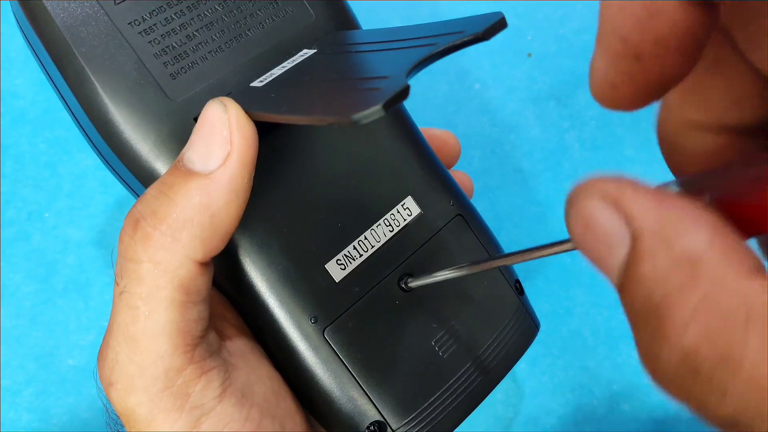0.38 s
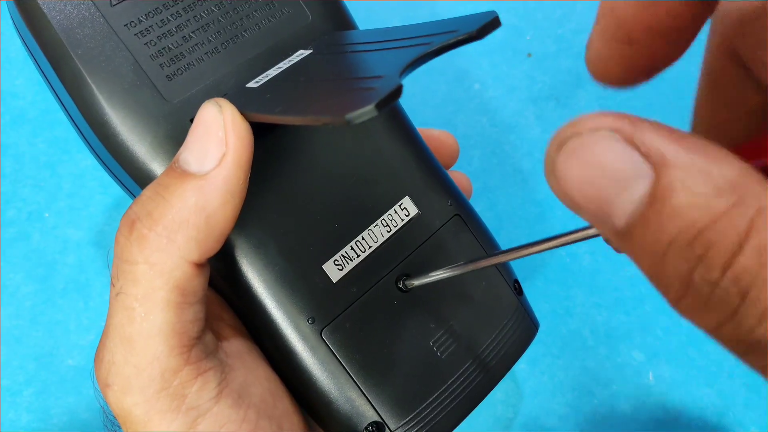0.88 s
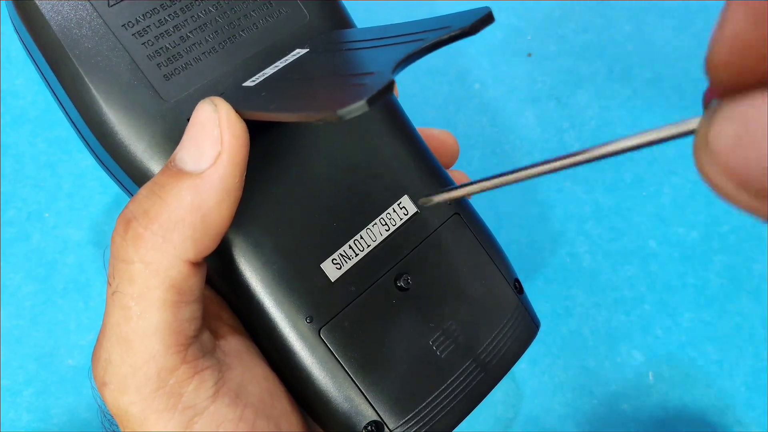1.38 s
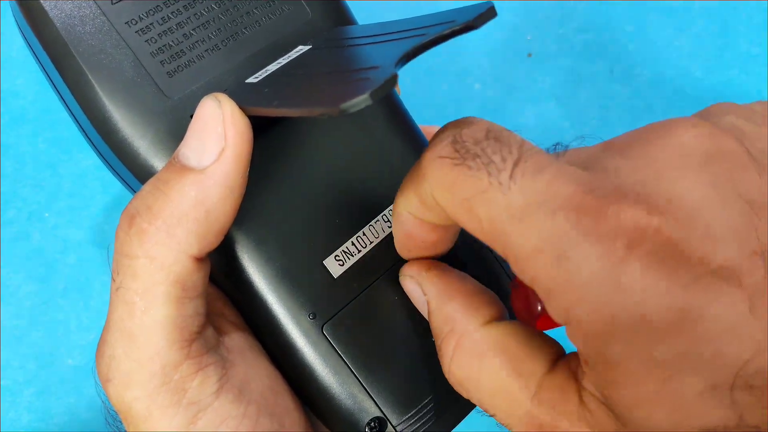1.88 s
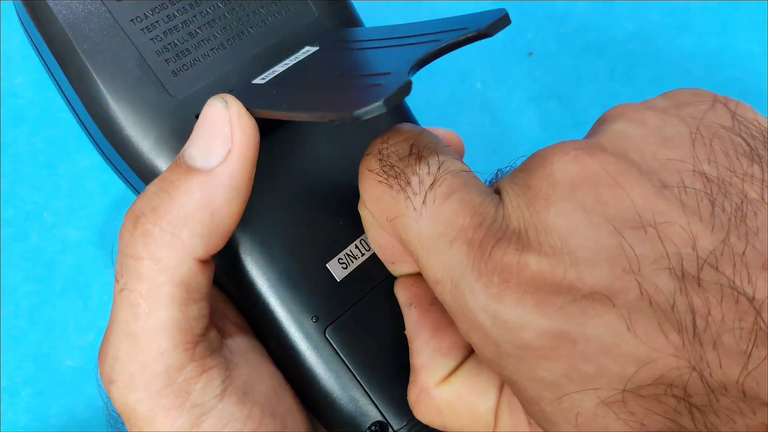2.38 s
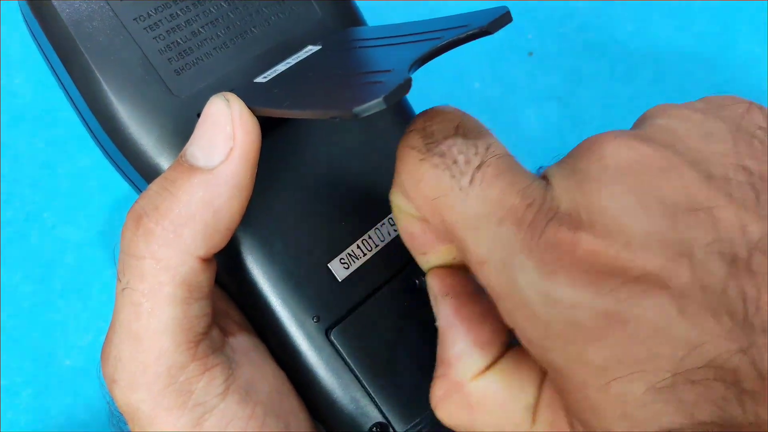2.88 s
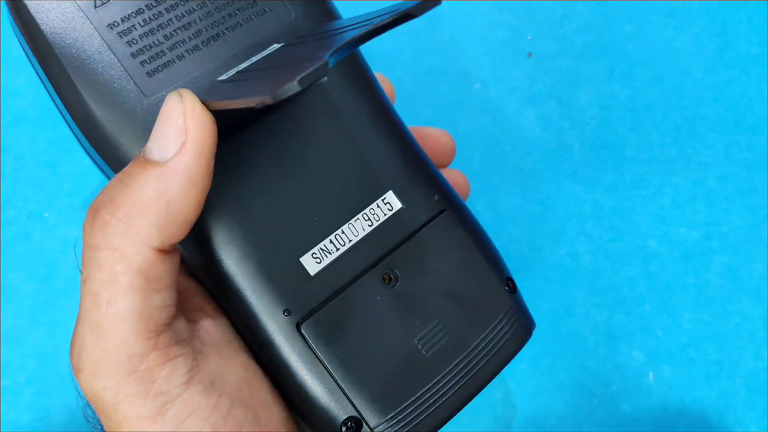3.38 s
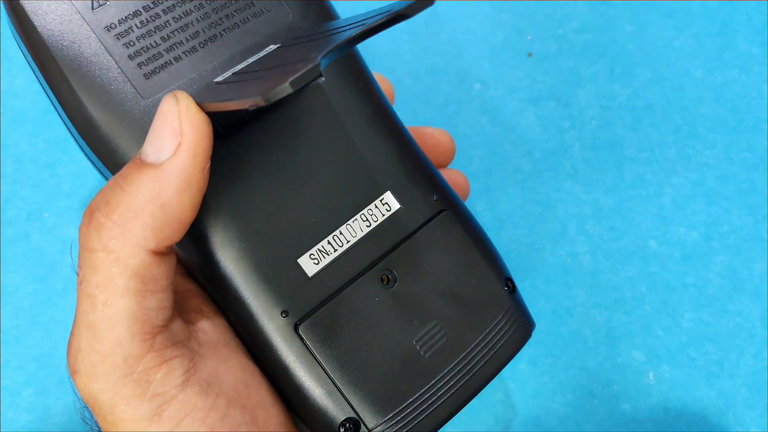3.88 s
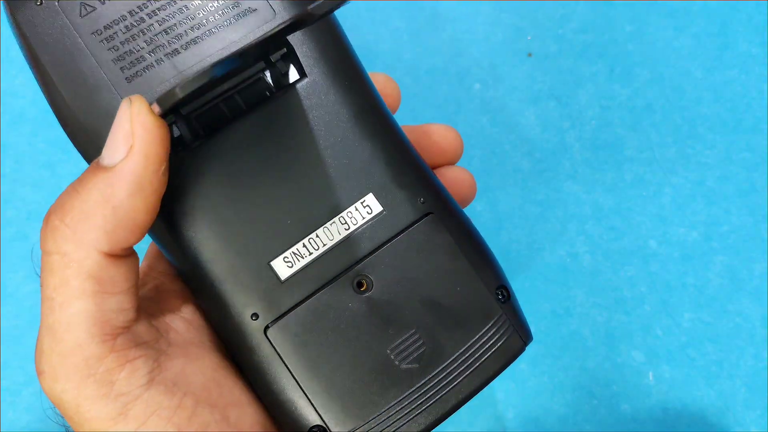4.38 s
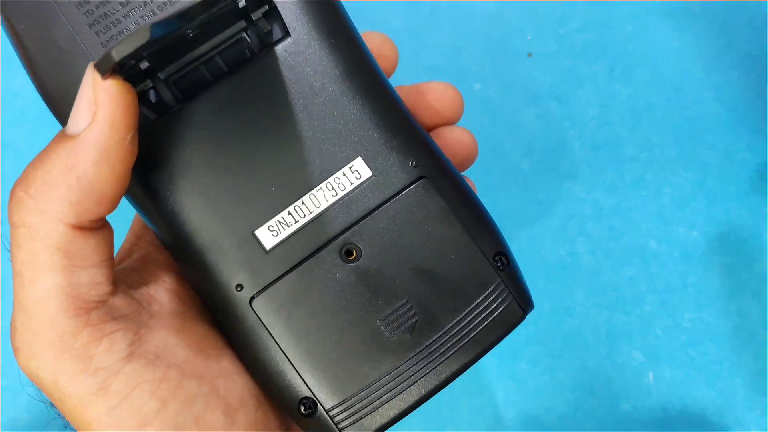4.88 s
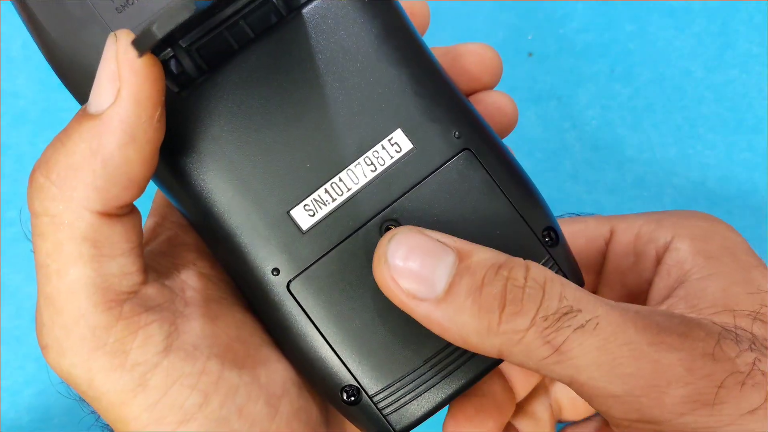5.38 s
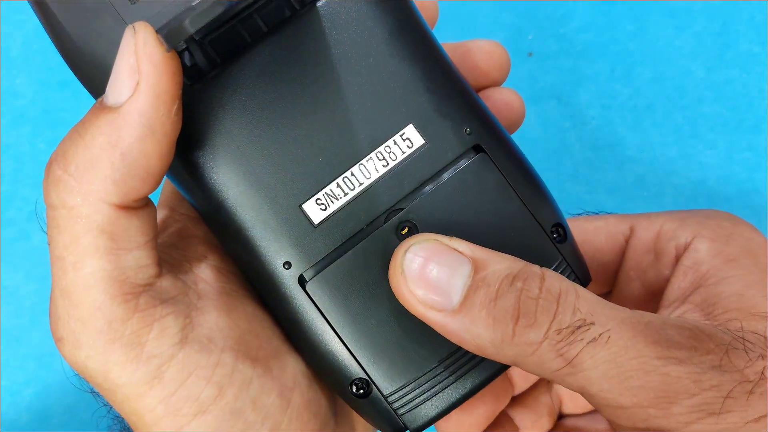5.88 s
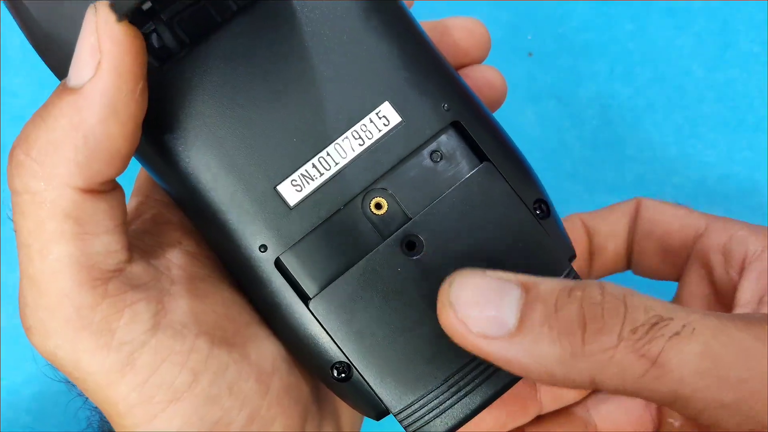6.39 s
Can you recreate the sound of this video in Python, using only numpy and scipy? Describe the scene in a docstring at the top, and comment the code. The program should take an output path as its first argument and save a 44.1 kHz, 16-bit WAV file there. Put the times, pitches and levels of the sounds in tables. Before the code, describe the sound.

A quiet small room with faint hiss and low air rumble, heard closely in stereo. From 0 to 1.5 s a screwdriver jolts a hand-held hollow plastic case: loose clusters of short, damped knocks about every 0.2 s, the strongest a hard crunchy clack at 0.83 s, then another busy cluster with a rub near 1.25 s. From 1.8 to 2.9 s fingers tap and pick at the tight cover, one crisp tick at 1.87 s, the rest faint. Near-silence follows. At 3.8 s a tiny screw ticks twice on the table to the right, then patters at 4.15-4.3 s. At 4.4 s the steel driver lands with a bright tick and brief thin ring; muffled bumps and low table booms continue to 5.1 s. From 5.35 s the thumb clicks the cover, strongest at 5.6-5.85 s, then a short gritty slide near 6.05 s and a last click at 6.27 s.

```python
"""In a quiet room, a small screwdriver jolts a hand-held plastic case while backing out a screw.
Fingers pick the screw out of the cover; screw and driver are laid on a table at the right,
then a thumb clicks the cover free and slides it open. Knocks ring damped tones with ticks and crunches,
rubs are made of tiny slips, and the steel shaft rings on. Room echo and two microphones' hiss surround it."""
import sys
import numpy as np
from scipy import signal
from scipy.fft import rfft, irfft, next_fast_len
from scipy.io import wavfile

SR = 44100
rng = np.random.default_rng(int(sys.argv[2]) if len(sys.argv) > 2 else 0)


def gain_from_db(level_db):
    """Turn a decibel level (scalar or array-like) into a linear amplitude factor."""
    decades = np.asarray(level_db, float) / 20
    return 10 ** decades


def dump_mix(stems):
    """Bounce the given channels to the path in sys.argv[1] as a 16-bit WAV at rate SR."""
    frames = np.atleast_2d(stems).T  # one column per channel
    limited = np.clip(frames, -1, 1)  # hard clip at full scale
    pcm = np.round(limited * 32767).astype(np.int16)
    wavfile.write(sys.argv[1], SR, pcm)


N = 287179  # length in samples

# Knocks on each body: (time [s], blow [dB], slope [dB per octave], hollow [dB], tick peak [dB])
# Slope is steep for a soft push, flat for a hard knock. Hollow lifts the lowest modes over the blow:
# high where the middle of a wall is hit, low near a rib.
CASE_KNOCKS = [(0.0203, -42.5, -7, 0.5, -56), (0.0499, -47.5, -14, 4, -62.0), (0.0871, -46.0, -18, -3, -64),
               (0.2116, -49, -7, -3, -71), (0.2312, -42, -8, 7, -73), (0.2506, -42.0, -10, 7, -69),
               (0.4029, -44, -7.5, -7, -57), (0.4252, -34, -9, 8.5, -63), (0.4572, -47, -11, 16, -66),
               (0.49, -76, -6, 24, -68), (0.6045, -44, -7.5, 1, -61), (0.6405, -37.5, -5.5, 2.5, -53),
               (0.6586, -38, -8, 12.5, -60), (0.6886, -63, -14, 27, -70), (0.7992, -38.5, -12, 1.5, -56),
               (0.8232, -25, -8, 6.5, -47), (0.8394, -19, -4, -33, -29), (0.8424, -31, -27, 20.5, -26.5),
               (0.8662, -55, -17, 5.5, -39.0), (0.9049, -53, -7.5, 17, -54), (0.9807, -46, -5.5, 11, -63),
               (1.0043, -45.5, -16, -1.5, -64), (1.0293, -42, -8, 1, -63), (1.068, -48.0, -20, 5, -73),
               (1.1614, -44, -10, -22, -57), (1.1755, -43, -9.5, 5, -67), (1.2115, -32.5, -8.5, 7, -52.5),
               (1.2374, -38.5, -13, 4, -56), (1.255, -30, -9.5, 2.5, -34.5), (1.2673, -47.5, 0.5, 1, -36),
               (1.2936, -38, -4.5, -11, -42.5), (1.3544, -44, -24, -19.0, -61.0),
               (1.4232, -52.5, -11, -9.0, -59), (1.4486, -53.5, -4.5, -56, -56),
               (1.4949, -54.5, -8, -9, -62)]
TABLE_KNOCKS = [(4.3979, -39, -2, -5.5, -27), (4.4113, -52.5, 0, 15.5, -53), (4.4244, -54, -2, 14.5, -30.5),
                (4.5292, -56, 0.6, 9, -65), (4.6902, -53, -5.5, 1, -33.5), (4.6962, -39.5, -18, 12, -54),
                (4.8408, -50.5, -13.5, 18, -51), (4.8935, -53.5, -16, 15, -66), (4.9432, -64, -11, 24, -63),
                (4.9754, -61.5, -22, 20, -67)]
COVER_KNOCKS = [(1.8307, -43, -9, 5, -59.0), (1.856, -43, -6, -11, -57), (1.8694, -37.5, -2, 2, -23.5),
                (2.1343, -59, -2.5, 1, -51.0), (2.158, -50, -5, -22.0, -46.0), (2.175, -51, -20, -6, -53),
                (2.1975, -50.5, -6, -1.5, -49.0), (2.2186, -44.0, -10.5, -16.0, -70),
                (2.4542, -58, -5.5, 6.5, -50), (2.494, -74, 1, 9.0, -56.0), (2.6494, -57.5, -5.5, 4, -76),
                (2.6893, -41, -29, 8.5, -65), (2.7631, -57.5, -16, 14, -72),
                (2.8197, -55.5, -11.0, 1, -67.0), (2.8629, -59, -9, 0, -64), (5.3445, -44.5, -3, 0.5, -41),
                (5.4212, -47.5, -11, 3.5, -65), (5.5541, -59, -10, 0, -81), (5.5979, -36, -12, -0.5, -47.5),
                (5.7105, -31.0, -8.5, -10, -37), (5.7815, -45, -4, 2, -43),
                (5.8246, -32.5, -2.5, -11.5, -31), (5.8813, -40, -17, -38, -63),
                (5.9295, -50.5, 1.5, 10.5, -36.5), (6.196, -52.5, -1.5, -16, -58),
                (6.2702, -42.5, -1.5, 11, -44.5)]
# The light screw lands and rolls: (time [s], tick peak [dB])
SCREW_ROLLS = [(3.8172, -37), (3.8505, -36.5), (4.141, -54.0), (4.1628, -49), (4.1806, -49), (4.209, -42.5),
               (4.2437, -48), (4.2721, -35.5), (4.281, -48), (4.3014, -49.0)]
# The driver's steel shaft lands on the table: (time [s], level [dB], brightness [dB per octave])
SHAFT_LANDINGS = [(4.398, -45, 0), (4.529, -49, -12)]

# Ringing tones of each body: (frequency [Hz], relative level [dB], time to fall 60 dB [s])
CASE_MODES = [(300, -8, 0.056), (327, 5, 0.098), (369.3, 7.5, 0.11), (450, -7, 0.045), (454, -5.5, 0.033),
              (569, 8, 0.054), (660, 3, 0.16), (850, -57, 0.062), (1058, 8, 0.065), (1360, 15, 0.045),
              (1460, 12.5, 0.042), (2240, 1, 0.0088), (2430, 4, 0.01), (2810, 9, 0.014),
              (3240, -34, 0.0053), (4200, -12, 0.047)]
TABLE_MODES = [(159, -12, 0.17), (221.2, 13, 0.17), (265, 21.5, 0.076), (317, 11, 0.039), (450, 15, 0.05),
               (548, -38, 0.036), (668, 9, 0.075), (906, -6, 0.065), (1140, -40, 0.057), (1530, -28, .03),
               (2300, -10, 0.011), (3250, -33, 0.015), (4500, -48, 0.015), (7400, -9, 0.01)]
TIGHT_COVER_MODES = [(215, 0.5, 0.094), (300, 5, 0.094), (373.6, 10, 0.083), (620, -14, 0.034),
                     (998, 18, 0.027), (1440, 5, 0.087), (1660, -15, 0.026), (1850, 1, 0.0069),
                     (2870, 0, 0.0089), (4300, 17, 0.013), (5500, -7, 0.0089)]  # the cover while it still sits tight in the case
LOOSE_COVER_MODES = [(161, 3, 0.021), (217, -37, 0.052), (285, 9, 0.054), (363.5, -0.5, 0.14),
                     (506.7, 10.5, 0.014), (590, -56, 0.011), (925, -49, 0.05), (1060, 7.5, 0.033),
                     (1413, 2, 0.011), (1610, 10.5, 0.029), (1900, 1.5, 0.02), (2920, -25, 0.0079),
                     (3030, 7.5, 0.015), (3500, -17, 0.011), (4180, 9.5, 0.032), (5900, -22, 0.016)]
SHAFT_MODES = [(4100, -19, .12), (7100, -8, .12), (7500, -7, .07), (11000, -8, .05), (13700, 1.5, .16)]
# Borders between the four groups of modes: (frequency [Hz])
GROUP_EDGES = [150, 500, 1800, 4000, 8000]
# How readily the three upper groups (panel, rim, edge) answer a blow: (level [dB])
CASE_GROUPS = [-1.26, 3.74, -7.9]
TABLE_GROUPS = [2.3, -4.5, 2]
TIGHT_COVER_GROUPS = [0.27, 0.55, 0.34]
LOOSE_COVER_GROUPS = [0.62, 3.3, -4.7]
# Each group's pitches vary a little at random from blow to blow: (typical shift [share of the pitch])
PITCH_SCATTER = [.005, .02, .06, .06]

# Tone colour of a hard contact as the microphones colour it: (frequency [Hz], level [dB])
HARD_TICK = [(4410, -54), (7500, -26), (8760, 11.5), (12000, 6.5), (16000, 0), (16500, -37)]
# Tone colour of small steel on the table: (frequency [Hz], level [dB])
SCREW_TICK = [(4410, -22), (7500, -3), (8610, -3.5), (11700, -6), (13100, -17), (16500, -16.5)]
# Tone colour of gritty rubbing: (frequency [Hz], level [dB])
GRIT = [(1760, -33), (3000, 4.5), (6040, 4.5), (6670, -3), (8750, 0.5), (15600, -11), (16500, -23)]
# Rubbing strokes: (start [s], fastest [s], end [s], body peak [dB], grit peak over body [dB])
# A stroke that ends before its fastest moment is cut off while still rising.
CASE_STROKES = [(0.2, 0.706, 0.52, -56, -12), (1.14, 1.248, 1.33, -38, -16.5)]
TABLE_STROKES = [(4.14, 4.268, 4.36, -63, -2), (4.82, 4.87, 5.15, -51.5, -33)]
COVER_STROKES = [(5.93, 6.05, 6.195, -50.5, -2), (6.08, 6.13, 6.195, -54.5, 3)]
# Pushes on the table top: (start [s], peak [s], end [s], peak [dB])
TABLE_PUSHES = [(4.26, 4.34, 4.39, -46), (4.40, 4.45, 4.47, -49), (4.69, 4.714, 4.83, -39.5),
                (4.85, 4.964, 5.04, -35), (5.04, 5.057, 5.16, -49)]

# How much louder case, table and cover are on the left, before the shading below: (level [dB])
LEFT_DB = [1.8, -1.5, 1.8]
# The microphones' housing shades the two ports unlike: (frequency [Hz], left over right [dB])
SHADING = [(1000, -0.3), (1800, 4), (3000, 4), (4000, 5.5), (6000, 4), (7500, -11), (9500, -11.5),
           (12000, 7)]
# The work surface returns each sound once, later at the right port: left and right rows of (delay [s])
BOUNCE_DELAY = [
    [0.0004644],
    [0.00069],
]
# Room echo: (frequency [Hz], time to fall 60 dB [s])
ROOM_DECAY = [(150, 0.97), (500, 0.5), (2000, 0.21), (8000, 0.37), (15000, 0.19)]
# Tone colour of the microphones' own noise: (frequency [Hz], level [dB])
HISS = [(180, -35), (300, -16.5), (406, -4.5), (742, -7), (1150, -14), (1330, -15.5), (1660, -17),
        (2240, -18), (4030, -24), (7380, -36), (12200, -32), (15700, -29), (16500, -52)]
# Tone colour of the room air: (frequency [Hz], level [dB])
RUMBLE = [(4.7, -61), (8.0, 10), (22, -0.5), (43, -6), (81, -6), (124, -8), (300, -12.5), (390, -22),
          (660, -120)]
# Treble colour of the microphone ports: (frequency [Hz], level [dB])
PORTS = [(4500, -0.5), (7400, -2), (8100, 0.5), (8700, 4.5), (10200, 0.5), (11600, 6.5), (13500, -0.5)]


def unit(x):
    """Scales a sound to rms 1."""
    return x / np.sqrt(np.mean(x ** 2) + 1e-20)


def start_unit(x):
    """Scales a sound to rms 1 over its first 15 ms."""
    return x / np.sqrt(np.mean(x[:660] ** 2) + 1e-20)


def along(points, hz):
    """Reads a curve of (frequency, value) points on a log frequency axis."""
    f, v = np.transpose(points)
    return np.interp(np.log(hz + 1), np.log(f + 1), v)


def filtered(x, response):
    """Multiplies the spectrum of x by a response that depends on frequency."""
    m = next_fast_len(x.shape[-1] + 4096)
    spectrum = rfft(x, m) * response(np.fft.rfftfreq(m, 1 / SR))
    return irfft(spectrum, m)[..., :x.shape[-1]]


def swell(start, peak, end, peak_db, swell_db):
    """A gain that climbs swell_db towards its peak, sinks as far after it, and is almost nothing outside."""
    t = np.arange(N) / SR
    levels = [peak_db - swell_db, peak_db, peak_db - swell_db]
    return gain_from_db(np.interp(t, [start, peak, end], levels, -120, -120))


def ring(modes, t, scatter_db, detune):
    """Dying tones that start together, with new strengths and slightly new pitches at each call."""
    hz, db, t60 = np.transpose(modes)[:, :, None]
    chance = rng.standard_normal((2, len(modes), 1))
    swing = np.sin(2 * np.pi * hz * (1 + detune * chance[1]) * t)
    return np.sum(gain_from_db(db + scatter_db * chance[0] - 60 * t / t60) * swing, 0)


def struck(hits, modes, groups_db, tick, tick_s, chatter_s, crunch, crunch_s):
    """A contact chatters for a few ms: it ticks, rings four groups of modes and crunches between them.

    chatter_s is when the force peaks; tick_s and crunch_s are times to fall 60 dB;
    crunch is the noise of each group as a share of its tone."""
    out, t = np.zeros(N + SR), np.arange(SR // 4) / SR
    edges = list(zip(GROUP_EDGES, GROUP_EDGES[1:]))
    groups = [[m for m in modes if lo <= m[0] < hi] for lo, hi in edges]
    bands = [signal.butter(3, edge, "band", fs=SR, output="sos") for edge in edges]
    octaves = np.log2(np.sqrt(np.prod(edges[1:], axis=1)) / 950)  # upper groups, counted from 950 Hz
    short_t = t[:1024]
    for s, blow_db, slope_db, hollow_db, tick_db in hits:
        levels = blow_db + np.r_[hollow_db, slope_db * octaves + groups_db]
        force = 0.35 + rng.standard_normal(1024)
        force *= short_t / chatter_s * np.exp(-short_t / chatter_s)
        y = np.zeros(len(t))
        for group, band, scatter, share, life, db in zip(groups, bands, PITCH_SCATTER, crunch, crunch_s, levels):
            modes_ring = ring(group, t, scatter_db=2.0, detune=scatter)
            tone = start_unit(signal.fftconvolve(modes_ring, force)[:len(t)])
            # the noise leans to the low end of each band
            dull = signal.lfilter([1], [1, -.75], rng.standard_normal(len(t)))
            fade = gain_from_db(-60 * t / life) * (1 - np.exp(-t / chatter_s))
            noise = signal.sosfilt(band, dull * fade)
            y += gain_from_db(db) * start_unit(tone + share * start_unit(noise))
        burst = rng.standard_normal(1024) * gain_from_db(-60 * short_t / tick_s)
        burst = filtered(burst, lambda hz: gain_from_db(along(tick, hz)))
        y[:1024] += gain_from_db(tick_db) * burst / np.abs(burst).max()
        out[round(s * SR):][:len(t)] += y
    return out[:N]


def rubbed(strokes, modes, slips_per_s, swell_db, grit_grows):
    """Tiny uneven slips hiss as grit and shake the body; the grit swells grit_grows times as many dB."""
    out, t = np.zeros(N), np.arange(SR // 4) / SR
    slips = (rng.random(N) < slips_per_s / SR) * rng.standard_normal(N)
    slips += 0.63 * rng.standard_normal(N)  # even finer slips between
    grit = unit(filtered(slips, lambda hz: gain_from_db(along(GRIT, hz))))
    damped = ring(modes, t, scatter_db=1.1, detune=0) * np.exp(-t / .0004)  # skin damps the modes
    body = unit(signal.fftconvolve(slips, damped)[:N])
    for start, peak, end, db, grit_db in strokes:
        out += swell(start, peak, end, db, swell_db) * body
        out += swell(start, peak, end, db + grit_db, grit_grows * swell_db) * grit
    return out


def plastic_case():
    """The hollow case in the hand: its walls ring and crunch under jolts and rubs."""
    knocks = struck(CASE_KNOCKS, CASE_MODES, CASE_GROUPS, HARD_TICK, tick_s=0.02, chatter_s=0.0011,
                    crunch=[0.27, 0.71, 0.29, 7.5], crunch_s=[0.016, 0.069, 0.015, 0.072])
    return knocks + rubbed(CASE_STROKES, CASE_MODES, slips_per_s=390, swell_db=20, grit_grows=1.04)


def cover():
    """The cover's knocks ring one set of modes while it sits tight and another once it is loose."""
    freed_s = 5.0
    tight = [hit for hit in COVER_KNOCKS if hit[0] < freed_s]
    loose = COVER_KNOCKS[len(tight):]
    out = struck(tight, TIGHT_COVER_MODES, TIGHT_COVER_GROUPS, HARD_TICK, tick_s=0.011, chatter_s=0.00096,
                 crunch=[0.96, 0.49, 0.55, 1.5], crunch_s=[0.06, 0.052, 0.019, 0.015])
    out += struck(loose, LOOSE_COVER_MODES, LOOSE_COVER_GROUPS, HARD_TICK, tick_s=0.012, chatter_s=0.0011,
                  crunch=[.6, .7, 1.1, 2.5], crunch_s=[0.11, 0.02, 0.0043, 0.018])
    return out + rubbed(COVER_STROKES, LOOSE_COVER_MODES, slips_per_s=2200, swell_db=11, grit_grows=2.3)


def table():
    """The table top answers screw and driver; the light screw is nearly all tick, with a weak blow."""
    blow_under_tick_db, slope_db, hollow_db = -25.5, -1, 7.5
    screw = [(s, db + blow_under_tick_db, slope_db, hollow_db, db) for s, db in SCREW_ROLLS]
    knocks = struck(screw + list(TABLE_KNOCKS), TABLE_MODES, TABLE_GROUPS, SCREW_TICK,
                    tick_s=0.01, chatter_s=0.0011,
                    crunch=[.6, .9, 1.5, 2.5], crunch_s=[0.039, 0.031, 0.065, 0.0075])
    return knocks + rubbed(TABLE_STROKES, TABLE_MODES, slips_per_s=1100, swell_db=17, grit_grows=1.1)


def shaft():
    """The steel shaft rings on after it lands; a softer landing wakes the high modes less."""
    out, t = np.zeros(N), np.arange(SR // 3) / SR
    for s, db, tilt_db in SHAFT_LANDINGS:
        modes = [(hz, level + db + tilt_db * np.log2(hz / 7000), t60) for hz, level, t60 in SHAFT_MODES]
        out[round(s * SR):][:len(t)] += ring(modes, t, scatter_db=2.0, detune=0)
    return out


def boom():
    """The table top's lowest mode, a wavering 98 Hz drone, swells under each push."""
    noise = filtered(rng.standard_normal(N), lambda hz: 1 / (1 + ((hz - 98) / 7) ** 2))
    tone = .07 * np.sin(2 * np.pi * 98 * np.arange(N) / SR)
    drone = unit(noise + tone)
    return sum(swell(*push, swell_db=15) for push in TABLE_PUSHES) * drone


def placed(x, low_hz, left_lag_s, left_db, wet_db):
    """A small body sends out no deep bass; delay and level set its side; surface and room follow."""
    x = signal.sosfilt(signal.butter(4, low_hz, "high", fs=SR, output="sos"), x)
    side = np.array([[1], [-1]])  # left, right

    def path(hz):
        level = gain_from_db(side * (left_db + along(SHADING, hz)) / 2)
        lag = np.exp(-1j * np.pi * hz * side * left_lag_s)
        bounce = 1 + gain_from_db(-14) * np.exp(-2j * np.pi * hz * np.array(BOUNCE_DELAY))
        return level * lag * bounce

    direct = filtered(x[None], path)
    wet = room(x)
    # long waves reach both microphones alike
    unlike = wet - wet.mean(0)
    unlike_bass = filtered(unlike, lambda hz: 1 / (1 + (hz / 450) ** 4))
    return direct + gain_from_db(wet_db) * (wet - 0.86 * unlike_bass)


def room(x):
    """Many blurred echoes: a noise tail for each ear, drawn anew every third of a second."""
    out, step = np.zeros((2, N + 2 * SR)), SR // 3
    for a in range(0, N, step):
        if np.abs(x[a:a + step]).max() < 1e-7:  # silence needs no tail
            continue
        hz, t, z = signal.stft(rng.standard_normal((2, SR // 2)), SR, nperseg=256)
        fade = gain_from_db(-60 * t / along(ROOM_DECAY, hz)[:, None])
        tail = signal.istft(z * fade, SR, nperseg=256)[1]
        tail = tail / np.linalg.norm(tail, axis=1, keepdims=True)
        wet = signal.fftconvolve(x[None, a:a + step], tail, axes=1)
        out[:, a + 250:a + 250 + wet.shape[1]] += wet  # starts 250 samples late
    return out[:, :N]


def hiss():
    """A steady floor: each microphone's own hiss, and a partly shared rumble of room air."""
    own = filtered(rng.standard_normal((2, N)), lambda hz: gain_from_db(along(HISS, hz)))
    mid, side = filtered(rng.standard_normal((2, N)), lambda hz: gain_from_db(along(RUMBLE, hz)))
    alike = 0.17  # left-right likeness of the rumble
    spread = np.sqrt((1 - alike) / (1 + alike))
    rumble = np.array([mid + spread * side, mid - spread * side]) / np.std(mid)
    return gain_from_db(-59) * unit(own) + gain_from_db(-51.5) * rumble


def scene():
    """Case and cover in front of the microphones, the table off to the right."""
    case_db, table_db, cover_db = LEFT_DB
    return (placed(plastic_case(), low_hz=290, left_lag_s=-0.00019, left_db=case_db, wet_db=-9)
            + placed(cover(), low_hz=184, left_lag_s=-0.00013, left_db=cover_db, wet_db=-9)
            + placed(table(), low_hz=180, left_lag_s=0.000209, left_db=table_db, wet_db=-5.5)
            + placed(shaft(), low_hz=120, left_lag_s=.00025, left_db=table_db, wet_db=-18)
            + boom() + hiss())


def low_pass(x):
    """Removes everything above the highest recorded frequency."""
    return signal.sosfilt(signal.butter(12, 17000, fs=SR, output="sos"), x)


def record(dry):
    """The microphone ports colour the treble."""
    mix = filtered(dry, lambda hz: gain_from_db(along(PORTS, hz)))
    return low_pass(mix)


dry = scene()
out = record(dry)
dump_mix(out)
```